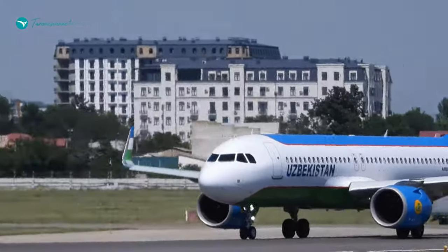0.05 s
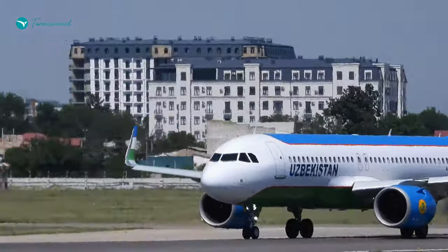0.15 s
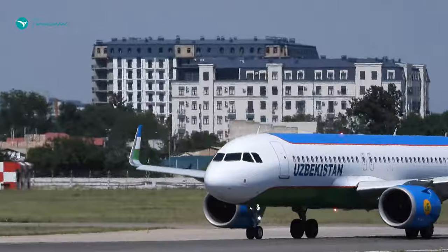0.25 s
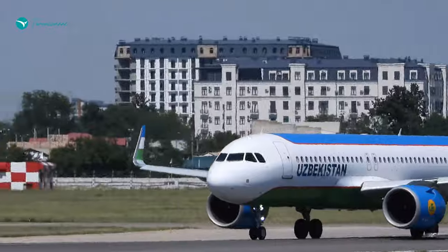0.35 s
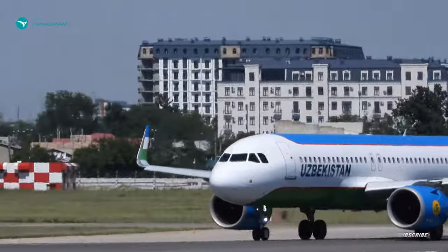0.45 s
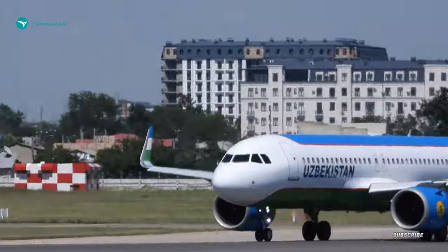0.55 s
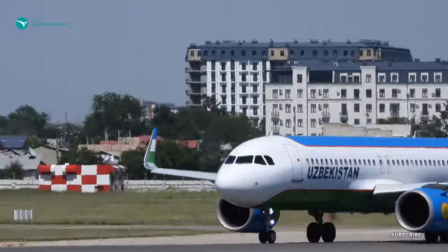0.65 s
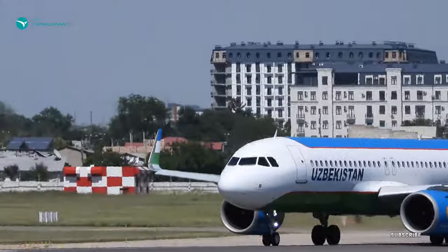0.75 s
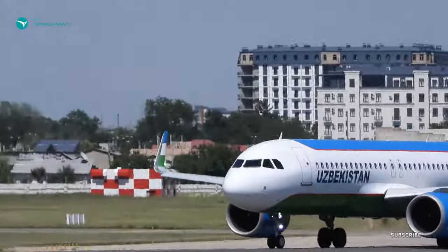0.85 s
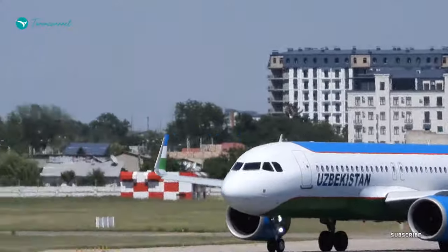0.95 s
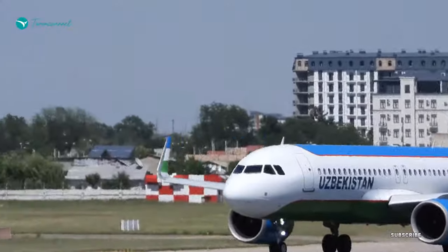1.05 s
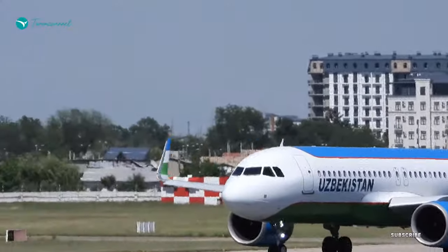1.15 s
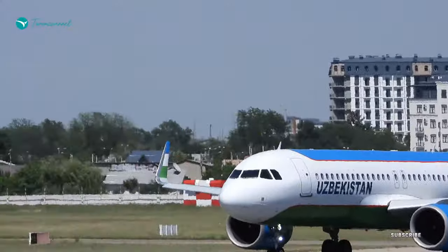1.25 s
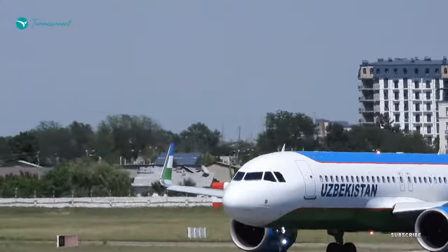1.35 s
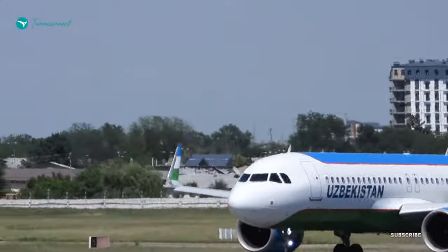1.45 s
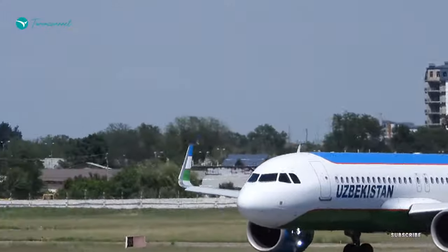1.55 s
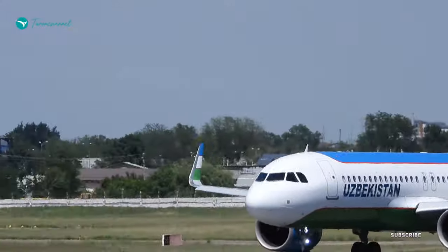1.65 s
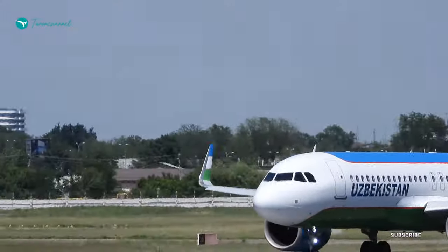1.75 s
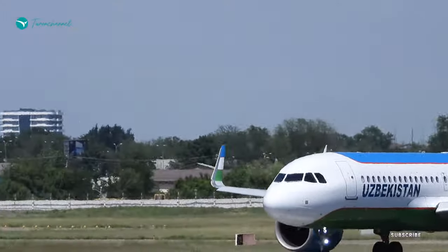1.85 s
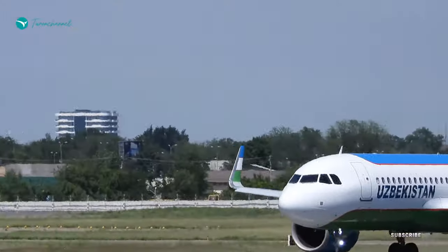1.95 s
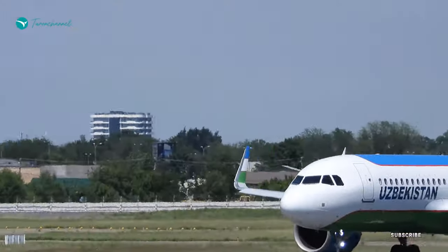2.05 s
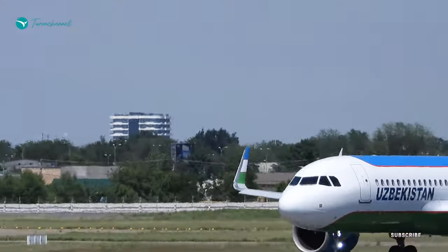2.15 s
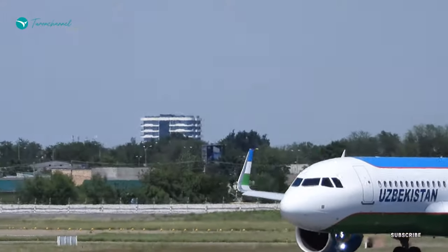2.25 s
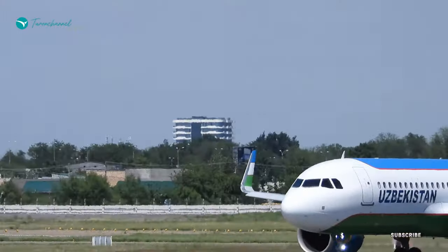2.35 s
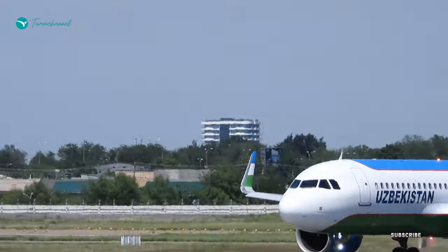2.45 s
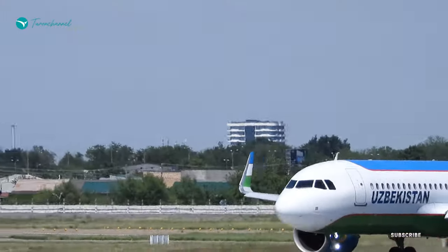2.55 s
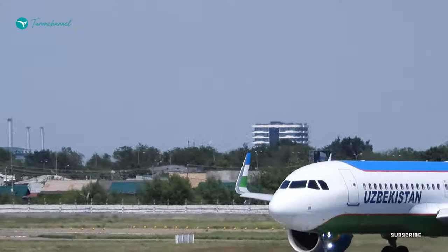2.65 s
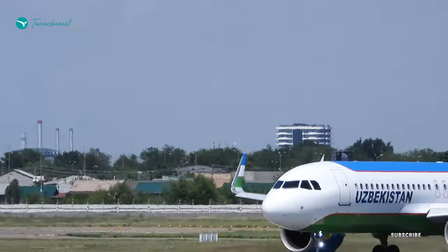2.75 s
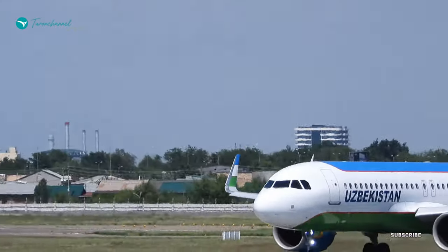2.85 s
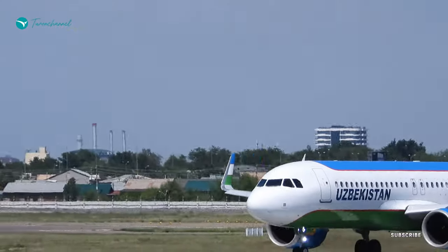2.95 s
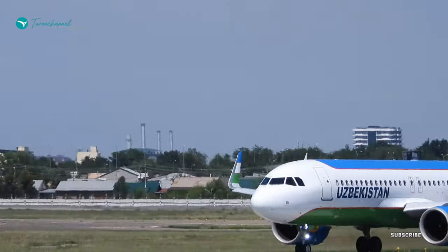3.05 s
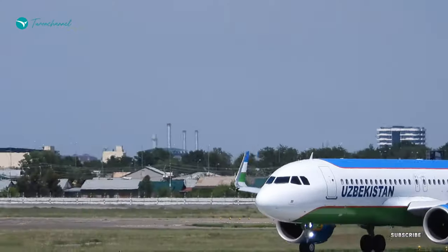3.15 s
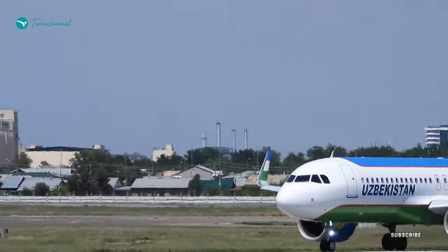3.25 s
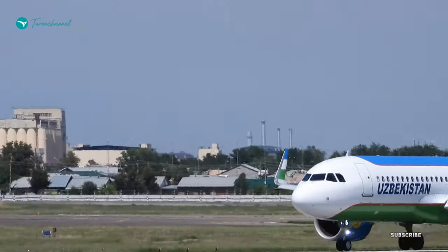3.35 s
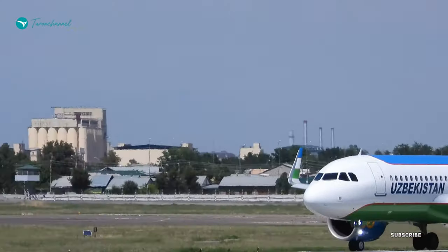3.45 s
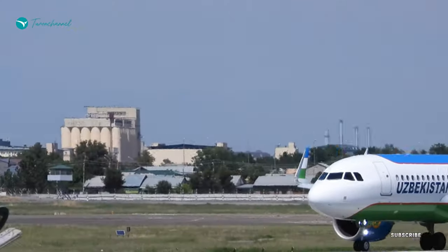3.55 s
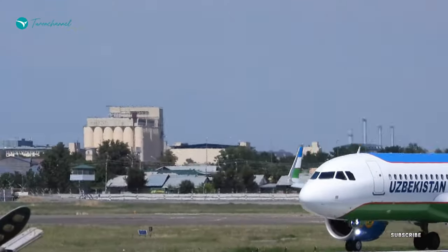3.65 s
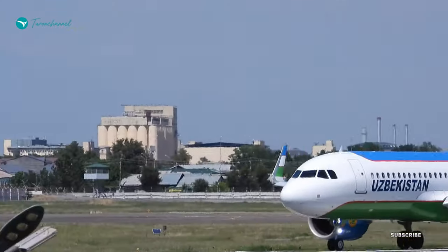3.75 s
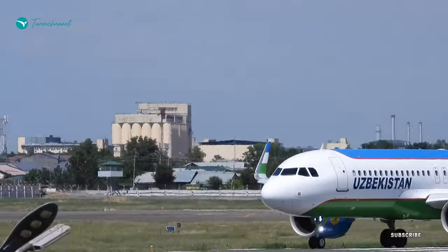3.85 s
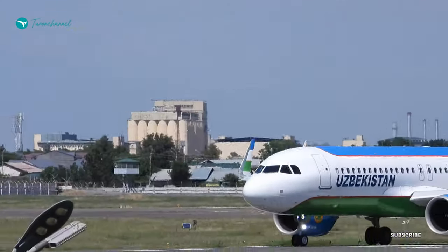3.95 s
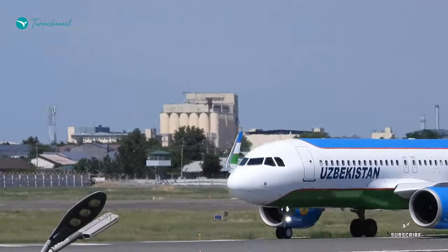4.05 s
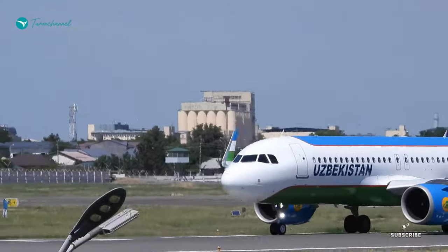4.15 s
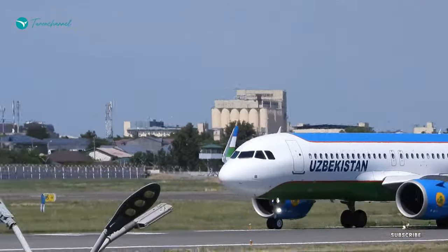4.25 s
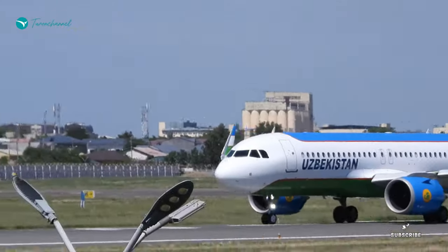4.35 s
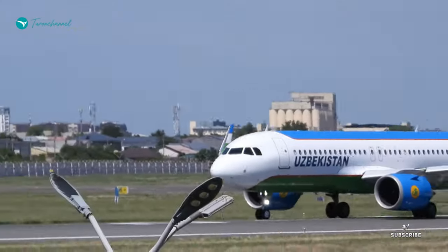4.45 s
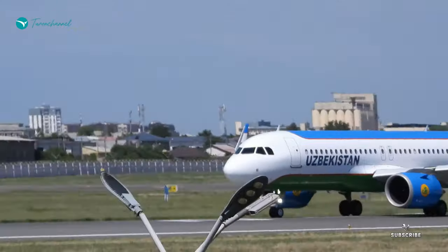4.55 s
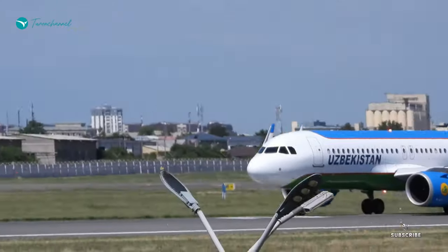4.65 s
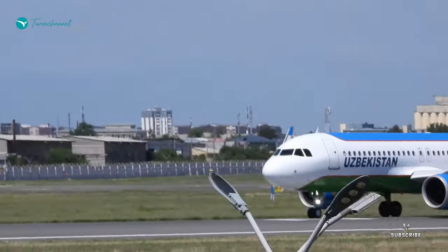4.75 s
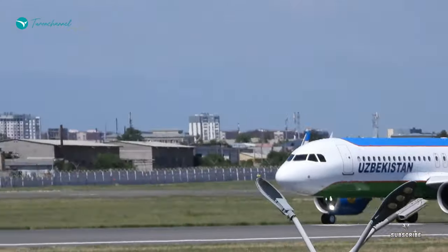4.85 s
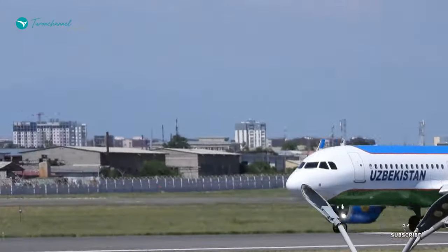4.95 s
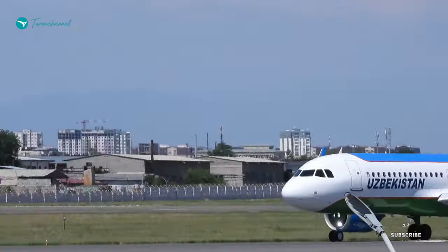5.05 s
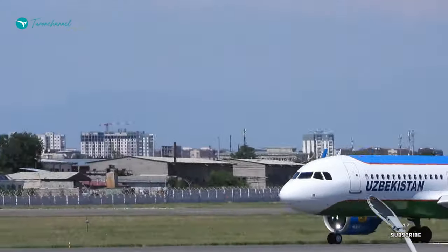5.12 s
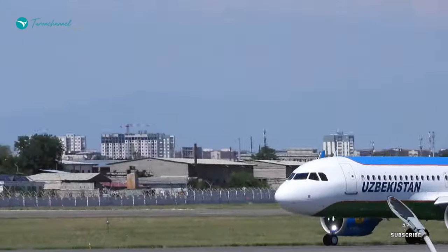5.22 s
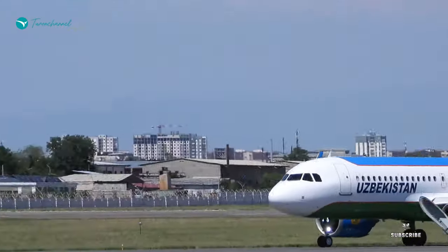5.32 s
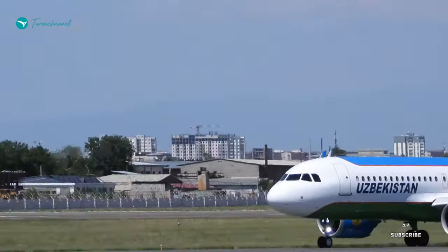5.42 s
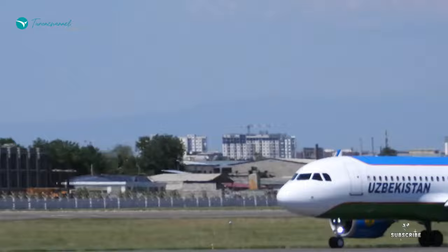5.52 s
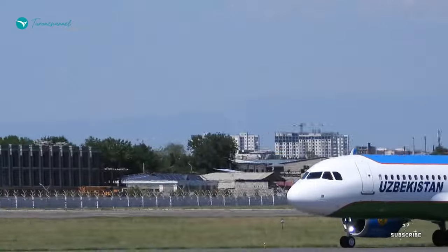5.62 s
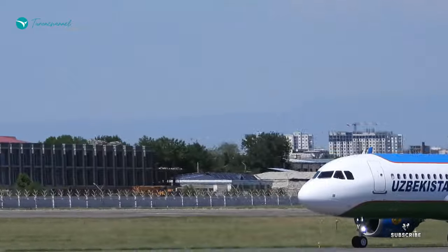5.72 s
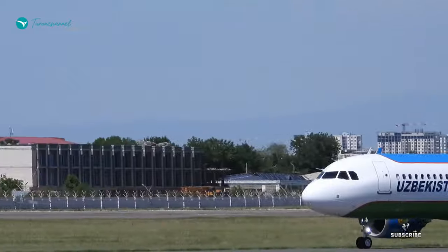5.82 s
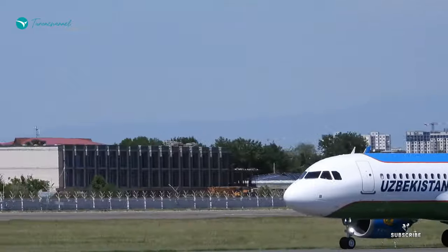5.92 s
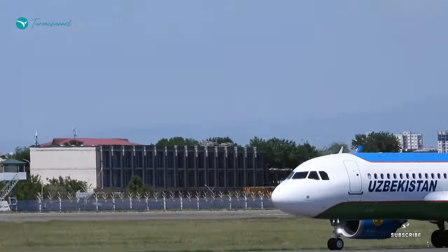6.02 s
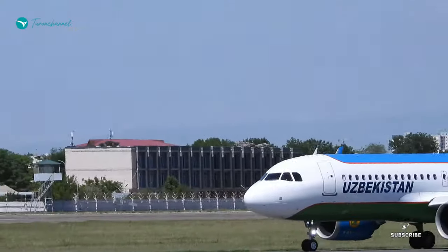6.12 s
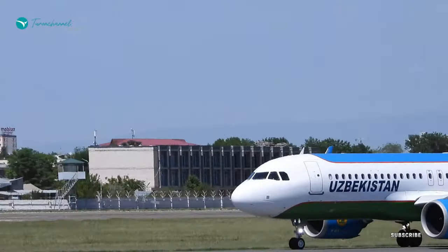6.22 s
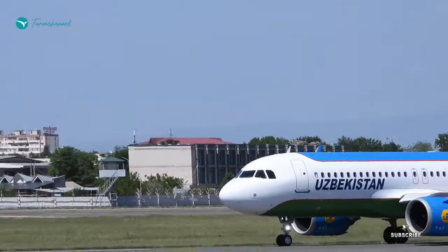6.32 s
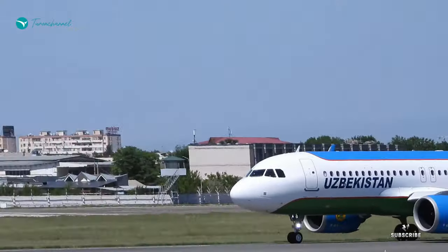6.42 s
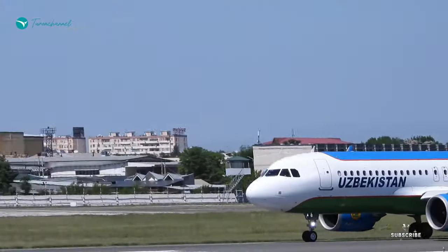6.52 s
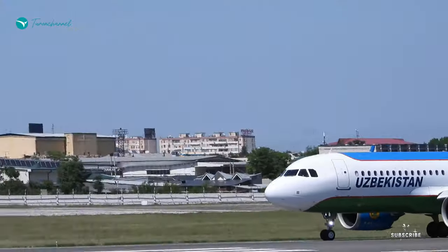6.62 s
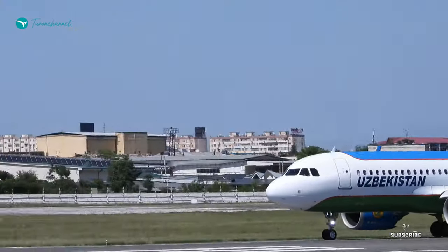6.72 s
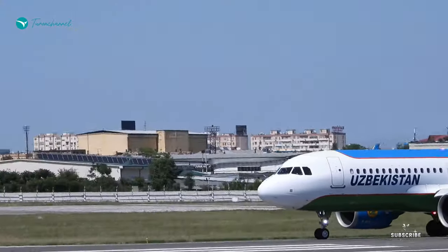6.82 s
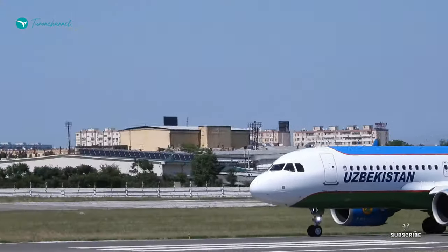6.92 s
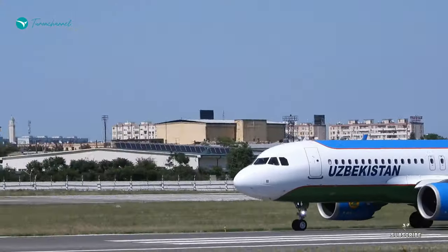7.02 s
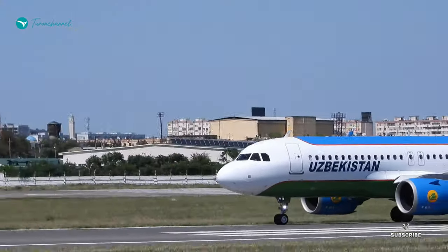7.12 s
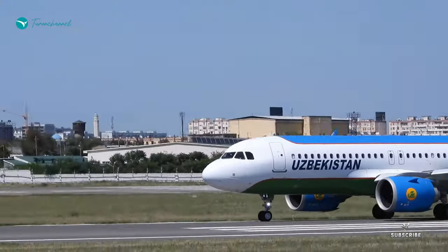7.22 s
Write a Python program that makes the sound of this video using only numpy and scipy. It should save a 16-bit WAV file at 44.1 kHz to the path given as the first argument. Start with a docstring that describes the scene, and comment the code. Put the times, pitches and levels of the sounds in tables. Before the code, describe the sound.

Outdoors beside a runway, gusts thump on a hand-held microphone and fingers rub and tick against its casing, with one soft knock midway. Behind this, the fan whine of a far-off airliner wavers and creeps up slightly in pitch over a weak rush. Then the hand noise ends and the jet draws near: a broad roar, a throbbing rumble and high whining tones build, loudest just before the end.

```python
"""A twin turbofan airliner rolls along a runway towards a hand-held camera.
Far off at first: the fan's blade tone and overtones fade in and out through warm, turbulent air
over a faint, broad roar. Wind buffets both microphone ports throughout. Until 5 s a hand rubs
and clicks the body near the left port. Then roar and combustor rumble swell, the second engine
comes out from behind the fuselage, and the sound peaks near 7 s."""
import sys
import numpy as np
from scipy import signal
from scipy.fft import rfft, irfft, next_fast_len
from scipy.io import wavfile
from scipy.ndimage import uniform_filter1d

SR = 44100
rng = np.random.default_rng(int(sys.argv[2]) if len(sys.argv) > 2 else 0)


def pcm_store(signal):
    """Save signal as 16-bit PCM."""
    levels = np.round(np.clip(np.atleast_2d(signal), -1, 1) * 32767)
    wavfile.write(sys.argv[1], SR, levels.astype(np.int16).T)


N = 321048

# hand rubbing (time [s], level [dB])
RUB_LEVEL = [(0, -78), (.32, -72), (.4, -48), (.5, -56), (.62, -47.5), (.74, -57.5), (.96, -70),
             (1.06, -58.5), (1.2, -47.5), (1.56, -55), (2.0, -49.5), (2.22, -55), (2.45, -51), (3.0, -50.5),
             (3.5, -51.5), (3.95, -52), (4.1, -47.5), (4.2, -54), (4.32, -53), (4.85, -51), (5.1, -85),
             (7.28, -79)]
# rubbing spectrum (frequency [Hz], density [dB])
RUB_COLOUR = [(400, -0.5), (700, 1), (1100, 9), (1700, -4.5), (2300, -14.5), (4000, -20.5), (6000, -28),
              (7500, -57)]
# body creaks (time [s], level [dB], left minus right [dB])
TICKS = [(0.4697, -56, 9.0), (0.4784, -63, 7.0), (0.498, -48, 16), (0.557, -52, 16), (0.5635, -51, 16),
         (0.58, -48, 21), (0.5934, -52, 21), (0.6024, -51, 13), (0.62, -48, 13), (0.6458, -67, 4.5),
         (1.224, -58, 0.0), (1.72, -47, 19), (1.7778, -47, 22), (1.9134, -60, 5), (2.0153, -48, 11),
         (2.4817, -59, 3.0), (3.0793, -56, 12), (3.0844, -49, 5), (3.104, -43.5, 13), (3.2803, -70, -3),
         (3.378, -45, 7), (3.426, -50, 7), (3.4819, -72, 14), (3.545, -54, 4), (3.597, -46, 18),
         (3.702, -54, 8), (4.207, -45, 10), (4.4466, -40.5, 12.5), (4.767, -44, 12)]
# snaps (time [s], level [dB])
SNAPS = [(0.398, -60), (0.4154, -45.5), (0.418, -48), (1.2717, -65), (1.734, -64), (2.994, -45.5),
         (3.5073, -78), (4.4478, -73), (6.945, -60)]
# bounces of one knock (time [s], level [dB], left minus right [dB])
KNOCKS = [(3.473, -31.5, 10), (3.478, -24, -5), (3.4823, -32.5, 17)]
# shell modes (frequency [Hz], gain [dB], t60 [s])
SHELL_MODES = [(172, -4, 0.066), (290, 17, 0.039), (471, 14.5, 0.053), (1050, 16, 0.021),
               (1420, -22, 0.017)]
# finger slips (time [s], level [dB], pitch [Hz], length [s], tapered share [0-1])
SLIPS = [(0.458, -47, 1080, 0.035, 0.8), (3.106, -38, 513, 0.02, 0.02), (3.69, -48.5, 474, 0.027, 0.5),
         (4.256, -45, 1153, 0.0086, 0.5), (4.688, -46.5, 282, 0.024, 0.01)]

# wind at the ports (time [s], level [dB])
WIND_LEVEL = [(0, -56), (.12, -53.5), (.56, -54.5), (.66, -46), (.77, -42.5), (.87, -46), (.92, -57),
              (1.03, -55.5), (1.1, -48), (1.25, -52.5), (1.34, -52), (1.49, -47.5), (1.6, -48), (2.0, -49),
              (2.25, -51), (2.52, -46.5), (2.66, -51), (2.88, -47.5), (3.04, -52.5), (3.7, -52.5),
              (4.0, -51.5), (4.2, -52.5), (5.2, -53), (5.6, -39.5), (6.1, -46.5), (6.76, -41),
              (7.28, -47.5)]
# wind spectrum (frequency [Hz], density [dB])
WIND_COLOUR = [(25, -21.5), (60, -15.5), (95, -27.5), (135, -15), (240, -4), (380, -6), (600, -10),
               (1000, -27)]
# strong eddies (time [s], level [dB], pitch [Hz], left minus right [dB], length [s])
BUFFETS = [(0.636, -45, 191, 3, 0.026), (0.713, -37, 290, -4, 0.018), (0.726, -34, 225, 2, 0.023),
           (0.787, -37, 334, -3, 0.022), (0.805, -35, 259, -1, 0.03), (0.878, -48, 450, -4, 0.019),
           (0.757, -46, 227, -1, 0.029), (0.848, -48, 220, 0, 0.023), (1.071, -41, 265, -1, 0.027),
           (1.106, -43.5, 320, -1, 0.034), (1.391, -43.5, 325, 3, 0.017), (1.46, -38, 242, 0, 0.04),
           (1.895, -43, 250, 3, 0.026), (1.962, -43, 380, 9, 0.028), (2.347, -40, 400, 1, 0.021),
           (2.405, -41.5, 323, -6, 0.019), (2.485, -44, 260, 0, 0.024), (2.519, -37, 277, 0, 0.035),
           (2.561, -39, 300, -2, 0.033), (2.664, -42, 315, -3, 0.024), (2.742, -44, 258, -1, 0.025),
           (2.905, -44, 173, 0, 0.031), (2.872, -39.5, 299.5, 2, 0.03), (2.95, -53, 140, 18, 0.031),
           (3.817, -49, 228, 20, 0.026), (3.846, -37, 277, 0.5, 0.021), (3.562, -46, 283, 1, 0.025),
           (3.966, -41.5, 234, -1, 0.031), (3.998, -42, 296, -3, 0.02), (4.149, -46, 380, 0, 0.017),
           (4.636, -47, 280, 2, 0.035), (4.051, -47, 284, -7, 0.025), (4.88, -40.5, 310, -1, 0.022),
           (5.209, -40.5, 372, -3, 0.02), (5.36, -33.5, 237, 0, 0.024), (5.419, -37, 277, 3, 0.021),
           (5.483, -36, 348, 1.5, 0.024), (5.635, -32.5, 202, 0.5, 0.03), (5.694, -36, 170, 1, 0.025),
           (5.728, -29.5, 310, -2, 0.019), (5.804, -36.5, 221, 1, 0.031), (5.878, -35, 290, 0, 0.019)]

# combustor rumble (time [s], level [dB])
RUMBLE_LEVEL = [(0, -60.5), (0.6, -67), (1.3, -71), (2.3, -54.5), (3.1, -68), (4.3, -59.5), (4.8, -64.5),
                (5.2, -51.5), (5.29, -52), (5.36, -47.5), (5.41, -53), (5.5, -44.5), (5.64, -46),
                (5.68, -53), (5.74, -45), (5.81, -47), (5.89, -42), (5.97, -52.5), (6.01, -46),
                (6.12, -48.5), (6.18, -34), (6.2, -49), (6.24, -47.5), (6.33, -39.5), (6.39, -42.5),
                (6.44, -34.5), (6.52, -36), (6.58, -31.5), (6.64, -31), (6.69, -27), (6.71, -22.5),
                (6.76, -32), (6.81, -25.5), (6.88, -29.5), (6.94, -24.5), (7.02, -26.5), (7.07, -26),
                (7.09, -26.5), (7.14, -39.5), (7.18, -27.5), (7.27, -31)]
# combustor resonances (frequency [Hz], width [Hz], gain [dB])
COMBUSTOR_MODES = [(297.5, 59.6, 3), (379, 86, -3.5), (238, 120, -13.5), (459.7, 100, -8), (547.3, 67, -15),
                   (596.4, 16, -5)]
# roar envelope (time [s], gain [dB])
ROAR_GAIN = [(0, -72), (.42, -69.5), (.6, -84.5), (.98, -71.5), (1.26, -75.5), (1.65, -68), (2.1, -69.5),
             (2.3, -63), (2.8, -67), (3.1, -73), (3.7, -65.5), (4.32, -67.5), (4.7, -68.5), (5.04, -62.5),
             (5.22, -60.5), (5.4, -55), (5.75, -52.5), (6.16, -51), (6.44, -45), (6.58, -42.5), (6.82, -37),
             (7.0, -36.5), (7.13, -36.5), (7.28, -41)]
# roar spectrum (frequency [Hz], density [dB])
ROAR_COLOUR = [(420, -28.5), (560, -5.5), (900, 4.5), (1250, -3.5), (1600, -2), (1850, -2.5), (2200, -7),
               (2500, -2.5), (3550, -6), (3780, -14.5), (4050, -16), (4800, -14), (5500, -20.5),
               (6500, -31.5), (13500, -66)]
# roar below 3.2 kHz; far = dull (time [s], gain [dB])
MIDDLE_GAIN = [(0, 10.5), (1.4, 6.5), (2.0, 5.5), (3.2, 4.5), (3.8, 1.5), (6.2, 4.5), (6.7, -1),
               (7.28, 4.5)]
# roar above 4.6 kHz (time [s], gain [dB])
TREBLE_GAIN = [(0, 4.5), (2.5, -1.5), (5, 0.5), (6, 1), (6.3, 4), (6.8, 1), (7.28, 1)]
# roar above 7 kHz, added to the treble gain (time [s], gain [dB])
TOP_GAIN = [(0, -5.5), (5, -8), (6.05, -5.5), (6.22, 8.5), (6.67, 4.5), (6.76, -8), (7.03, -6), (7.28, 6)]
# left-right likeness of the roar (frequency [Hz], coherence [0-1])
COHERENCE = [(300, 1), (1000, 0.97), (3500, 0.94), (6500, 0.75), (9000, .2)]

# near fan, spooling up and settling (time [s], blade-passing rate [Hz])
BLADE_RATE = [(0, 933.5), (.46, 945), (.92, 954.5), (1.38, 963), (1.95, 971), (2.4, 975), (2.8, 978),
              (3.5, 981), (4.5, 986), (5.56, 992), (6.4, 991.5), (7.28, 986)]
# harmonics 1-3; each drops out when its air paths cancel (time [s], level [dB])
BLADE_LEVEL = [(0.0, -43.5), (0.11, -43), (0.15, -52.5), (0.25, -38.5), (0.35, -61), (0.37, -50.5),
               (0.41, -49.5), (0.44, -67), (0.56, -64), (0.74, -52.5), (0.77, -68), (0.83, -67),
               (0.85, -53), (0.89, -53.5), (0.96, -55), (0.99, -68), (1.1, -44.5), (1.19, -66),
               (1.23, -48.5), (1.28, -41.5), (1.37, -46.5), (1.4, -77), (1.43, -63), (1.46, -52),
               (1.48, -50.5), (1.55, -44), (1.71, -48.5), (1.75, -59), (1.81, -48), (1.9, -55.5),
               (1.96, -43), (2.06, -50.5), (2.1, -38.5), (2.24, -36), (2.32, -52), (2.36, -45.5),
               (2.45, -60), (2.49, -47.5), (2.53, -59), (2.56, -45.5), (2.6, -65), (2.62, -43.5),
               (2.68, -37.5), (2.77, -56), (2.81, -44), (2.89, -45.5), (2.92, -55), (3.03, -45), (3.1, -63),
               (3.14, -69), (3.16, -51), (3.29, -49), (3.33, -39.5), (3.41, -48.5), (3.46, -42),
               (3.51, -52), (3.61, -45.5), (3.66, -67), (3.71, -44.5), (3.73, -56), (3.76, -38),
               (3.79, -35), (3.9, -53), (3.94, -47), (3.97, -72), (4.05, -49), (4.08, -70), (4.1, -49),
               (4.13, -65.0), (4.15, -65), (4.19, -52), (4.23, -65.0), (4.25, -66), (4.29, -81),
               (4.31, -85), (4.34, -42), (4.37, -42), (4.46, -44), (4.53, -54.5), (4.56, -49), (4.63, -47),
               (4.66, -48), (4.69, -76), (4.71, -60), (4.79, -40), (4.85, -64), (4.89, -42.5),
               (4.95, -49.5), (5.01, -41), (5.05, -46), (5.07, -54), (5.28, -33), (5.46, -35), (5.54, -27),
               (5.63, -35.5), (5.66, -48.5), (5.69, -36), (5.74, -30), (5.8, -35), (5.92, -32), (5.98, -41),
               (6.0, -57.5), (6.09, -30), (6.13, -49.5), (6.19, -28.5), (6.3, -26.5), (6.36, -34),
               (6.42, -24.5), (6.49, -26), (6.57, -30.5), (6.6, -40), (6.64, -22), (6.81, -25), (6.87, -14),
               (6.94, -16), (6.98, -25.5), (7.05, -18), (7.1, -32), (7.17, -22.5), (7.27, -31)]
SECOND_LEVEL = [(0.0, -75), (0.12, -63), (0.2, -70), (0.46, -61.5), (0.54, -72), (0.63, -62.5), (0.79, -70),
                (1.24, -62), (1.29, -79), (1.34, -63), (1.43, -64), (1.47, -70), (1.65, -53), (1.72, -67),
                (1.94, -73), (2.0, -55), (2.13, -71), (2.22, -53), (2.28, -60.5), (2.36, -46), (2.57, -70),
                (2.62, -65.5), (2.91, -63.5), (3.01, -80), (3.13, -69), (3.27, -81), (3.31, -68),
                (3.43, -64), (3.48, -83), (3.58, -66), (3.76, -76), (3.83, -60.5), (3.95, -68.5),
                (4.12, -69), (4.16, -63), (4.21, -76), (4.33, -56), (4.56, -65.5), (4.6, -74), (4.66, -82),
                (4.76, -61), (4.84, -71.0), (4.9, -57.5), (5.03, -65), (5.08, -71), (5.16, -56),
                (5.25, -67), (5.31, -50.5), (5.38, -56), (5.45, -47), (5.66, -50.5), (5.75, -60),
                (5.87, -47.5), (6.01, -58), (6.19, -52), (6.23, -64), (6.28, -49), (6.44, -37.5),
                (6.52, -45.5), (6.68, -34), (6.74, -43), (6.82, -28), (6.96, -37.5), (7.27, -42.5)]
THIRD_LEVEL = [(0.0, -65.5), (0.17, -67), (0.24, -80), (0.38, -69), (0.45, -80), (0.7, -81), (0.87, -74),
               (1.05, -72.5), (1.22, -76.5), (1.32, -70), (1.41, -75), (1.62, -73), (1.96, -66.5),
               (2.06, -76), (2.23, -57), (2.43, -71.0), (2.67, -64.5), (2.95, -68), (3.04, -74),
               (3.16, -68), (3.24, -88), (3.44, -68.5), (3.71, -75), (3.81, -68), (4.3, -71.5), (4.41, -67),
               (4.5, -72.5), (4.81, -69), (4.92, -76.5), (5.07, -63), (5.19, -74), (5.55, -57.5),
               (6.08, -64), (6.85, -35), (7.16, -43.5), (7.27, -61)]
# base of all high tones (time [s], level [dB])
WHINE_LEVEL = [(0.0, -81), (0.22, -76), (0.53, -86), (0.65, -79), (0.77, -90), (0.9, -78.5), (1.08, -88),
               (1.31, -77), (1.45, -83.5), (1.66, -78), (1.8, -81.0), (1.95, -76), (2.22, -77), (2.3, -72),
               (2.37, -74.5), (2.45, -78), (2.75, -79.5), (3.01, -81), (3.95, -79), (4.58, -77),
               (4.71, -82), (5.13, -72.5), (5.28, -76), (5.66, -64), (5.92, -71), (7.03, -52), (7.27, -59)]
# high tones; fractional ones from rotor-stator interplay (order [x blade rate])
WHINE_ORDERS = [3.72, 4, 4.722, 5, 5.732, 6]
# one per order (level over whine [dB])
WHINE_GAINS = [-11, -8, -10, 1, -14, -20.5]
# fractional orders grow as the intakes near (time [s], gain [dB])
FRACTIONAL_GAIN = [(0, -1), (5.5, 4.5), (6.5, 4.5), (7.28, 6.5)]
# far fan (time [s], blade-passing rate [Hz], level over whine [dB])
FAR_FAN = [(0, 930, -25), (5, 983, -16), (6, 986, -5), (6.6, 986, 0), (7.28, 985, 0)]
# its harmonics (order [x blade rate], gain [dB])
FAR_ORDERS = [(4, 0), (5, 0), (6, -10)]

STROKE_DB, STROKE_RATE_HZ = .7, 10
GUST_DB, GUST_RATE_HZ = 1.5, 10
THROB_DB, THROB_RATE_HZ = 1.5, 20
FLUTTER_DB, FLUTTER_RATE_HZ = .9, 40
OVERTONE_FADE, WHINE_FADE, FADE_HZ_PER_ORDER = .3, .12, 25
LOW_CUT_HZ, HIGH_CUT_HZ, HISS_DB = 90, 15800, -104
LEFT_RIGHT = np.array([[1], [-1]])


def undb(db):
    return 10 ** (np.asarray(db) / 20)


def unit_rms(x):
    return x / np.sqrt(np.mean(x ** 2))


def curve(table, column=1):
    """One column, linear in time, per sample."""
    points = np.transpose(table)
    return np.interp(np.arange(N) / SR, points[0], points[column])


def at_hz(table, hz):
    """Table value, linear in log frequency."""
    points_hz, values = np.transpose(table)
    return np.interp(np.log(hz), np.log(points_hz), values)


def shelf(hz, corner_hz):
    """0 to 1 over the half octave above the corner."""
    return np.clip(2 * np.log2(hz / corner_hz), 0, 1)


def walk(rate_hz):
    """Random steps at rate_hz, smoothed twice; RMS 1."""
    step = 32
    hold = int(SR / rate_hz / step)
    coarse = np.repeat(rng.standard_normal(N // step // hold + 2), hold)
    coarse = unit_rms(uniform_filter1d(uniform_filter1d(coarse, hold), hold))
    return np.interp(np.arange(N) / step, np.arange(len(coarse)), coarse)


def complex_walk(rate_hz):
    return walk(rate_hz) + 1j * walk(rate_hz)


def stereo(mid, side, coherence):
    """Left and right of given coherence."""
    return np.sqrt((1 + coherence) / 2) * mid + np.sqrt((1 - coherence) / 2) * side * LEFT_RIGHT


def add(out, start_s, shape, pan_db):
    """Mix in a short sound; pan_db is left minus right."""
    i = int(start_s * SR)
    out[:, i:i + shape.shape[-1]] += shape[..., :N - i] * undb(LEFT_RIGHT * pan_db / 2)


def bands(x, colour, per_octave):
    """Colour x, then yield overlapping bands as (centre [Hz], signal)."""
    size = next_fast_len(N)
    hz = np.maximum(np.arange(size // 2 + 1) * SR / size, 1)
    spectrum = rfft(x, size) * undb(at_hz(colour, hz))
    place = per_octave * np.log2(hz)
    first, last = (int(per_octave * np.log2(colour[i][0])) for i in (0, -1))
    for k in range(first, last + 1):
        share = np.cos(np.pi / 2 * np.clip(place - k, -1, 1)) ** 2
        yield 2 ** (k / per_octave), irfft(spectrum * share, size)[..., :N]


def resonance(x, hz, width_hz):
    """Band-pass, applied twice."""
    b, a = signal.iirpeak(hz, hz / width_hz, SR)
    return signal.lfilter(b, a, signal.lfilter(b, a, x))


def lumpy_noise(colour, lump_db, rate_hz):
    """Independent noise per port: octave bands flicker, the sum comes in lumps."""
    octaves = bands(rng.standard_normal((2, N)), colour, per_octave=1)
    ports = sum(undb(1.1 * walk(18)) * band for _, band in octaves)
    return np.array([unit_rms(port * undb(lump_db * walk(rate_hz))) for port in ports])


def rubbing():
    """Grainy friction under wandering hand pressure, mostly left."""
    level_db = curve(RUB_LEVEL) + STROKE_DB * walk(STROKE_RATE_HZ) + 3 * LEFT_RIGHT
    return undb(level_db) * lumpy_noise(RUB_COLOUR, lump_db=2.8, rate_hz=120)


def ticks():
    """The camera body creaks in dull ticks."""
    out = np.zeros((2, N))
    t = np.arange(1024) / SR
    dull = signal.butter(6, [800, 6000], "band", fs=SR, output="sos")
    for start_s, db, pan_db in TICKS:
        grit = signal.lfilter([1], [1, -.88], rng.standard_normal(len(t)) ** 3)
        crack = grit * t * np.exp(-t / .0028)
        tick = signal.sosfilt(dull, crack + undb(7.5) * resonance(crack, 1400, 700))
        add(out, start_s, undb(db) * tick / abs(crack).max(), pan_db)
    return out


def snaps():
    """Sharp cracks with a brief, faint noise decay, at the left port."""
    out = np.zeros((2, N))
    t = np.arange(1024) / SR
    for start_s, db in SNAPS:
        snap = rng.standard_normal(len(t)) * (np.exp(-t / .00055) + undb(-23) * np.exp(-t / .004))
        body = undb(4.5) * resonance(snap, 1800, 2000)
        add(out, start_s, undb(db) * (snap + body) / abs(snap).max(), pan_db=20)
    return out


def knock():
    """A soft fingertip bounces on the shell and rings its modes."""
    out = np.zeros((2, N))
    t = np.arange(4096) / SR
    ring = sum(undb(db - 60 * t / t60_s) * np.sin(2 * np.pi * hz * t) for hz, db, t60_s in SHELL_MODES)
    ring *= 1 - np.exp(-(t / .00043) ** 2)
    for start_s, db, pan_db in KNOCKS:
        add(out, start_s, -undb(db) * ring / abs(ring).max(), pan_db)
    return out


def slips():
    """A finger slips; the shell hums at the left port."""
    out = np.zeros((2, N))
    for start_s, db, hz, length_s, taper in SLIPS:
        t = np.arange(int(length_s * SR)) / SR
        hum = signal.windows.tukey(len(t), taper) * np.sin(2 * np.pi * hz * t)
        add(out, start_s, undb(db) * hum, pan_db=16)
    return out


def wind():
    """Eddies thump each port separately."""
    level_db = curve(WIND_LEVEL) + GUST_DB * walk(GUST_RATE_HZ)
    return undb(level_db) * lumpy_noise(WIND_COLOUR, lump_db=3.6, rate_hz=45)


def buffets(roughness=.8):
    """The strongest eddies: bursts of a few rough, gliding cycles."""
    out = np.zeros((2, N))
    for start_s, db, hz, pan_db, length_s in BUFFETS:
        eddy = rng.standard_normal((2, 4096))
        count = int(length_s * SR)
        window = signal.windows.tukey(count, .8)
        burst = resonance(resonance(eddy, 1.3 * hz, 2 * hz), 1.3 * hz, 3 * hz)[:, -count:] * window
        burst /= abs(burst).max(axis=1, keepdims=True)
        glide_hz = hz * (1 + .5 * eddy[1, 2] * np.linspace(-.5, .5, count))
        start_rad = 2 * eddy[0, 0] + eddy[:, 1:2]
        cycles = np.sin(2 * np.pi * np.cumsum(glide_hz) / SR + start_rad) * window
        add(out, start_s, undb(db) * (cycles + roughness * burst), pan_db)
    return out


def rumble(noise):
    """Noise drives the combustor resonances; the level throbs."""
    modes = sum(undb(db) * resonance(resonance(noise, hz, width_hz), hz, 2 * width_hz)
                for hz, width_hz, db in COMBUSTOR_MODES)
    low = stereo(*modes, COHERENCE[0][1])
    running_rms = np.sqrt(uniform_filter1d(low[0] ** 2, SR // 12))
    return undb(curve(RUMBLE_LEVEL) + THROB_DB * walk(THROB_RATE_HZ)) * low / running_rms


def roar(noise):
    """Exhaust and fan rush; narrow bands fade separately on their way through the air."""
    middle_db, treble_db, top_db = curve(MIDDLE_GAIN), curve(TREBLE_GAIN), curve(TOP_GAIN)
    swell_db = .4 * walk(9)
    out = 0
    for hz, band in bands(noise, ROAR_COLOUR, per_octave=7):
        middle_share = np.clip(np.log2(3200 / hz), 0, 1)
        tilt_db = middle_share * middle_db + shelf(hz, 4600) * treble_db + shelf(hz, 7000) * top_db
        fade_db = (2.6 - shelf(hz, 3500)) * walk(18)
        out += undb(tilt_db + swell_db + fade_db) * stereo(*band, at_hz(COHERENCE, hz))
    return undb(curve(ROAR_GAIN) + 19.5) * out


def far_fan():
    """Whine of the slightly slower engine, hidden by the fuselage at first."""
    blade_rad = 2 * np.pi * np.cumsum(curve(FAR_FAN)) / SR
    level_db = curve(WHINE_LEVEL) + curve(FAR_FAN, column=2)
    return sum(undb(level_db + db + 2.5 * walk(20)) * np.sin(order * (blade_rad + .3 * walk(20)))
               for order, db in FAR_ORDERS)


def turbulent_tone(order, blade_rad):
    """One fan tone: turbulence shakes its phase, eddies scatter it, shifting paths fade overtones."""
    shake_rad = min(order, 3.5) * (.55 * walk(11) + .17 * walk(45))
    scatter_depth = .12 * order ** 1.7 if order < 2.5 else .55 if order < 3.5 else .22
    scatter = scatter_depth * complex_walk(70)
    fade = OVERTONE_FADE if order in (2, 3) else WHINE_FADE
    shifting = fade * complex_walk(order * FADE_HZ_PER_ORDER)
    paths = 1 if order == 1 else 1 - fade / 2 + shifting
    spread_rad = .062 * walk(24) * LEFT_RIGHT
    carrier = np.exp(1j * (order * blade_rad + shake_rad + spread_rad))
    return np.sqrt(2) * np.imag(paths * (1 + scatter) * carrier)


def near_fan():
    """Blade-passing tone, harmonics and high whine, each with its own flutter."""
    blade_rad = 2 * np.pi * np.cumsum(curve(BLADE_RATE)) / SR
    tones = [(1, curve(BLADE_LEVEL) + FLUTTER_DB * walk(FLUTTER_RATE_HZ)),
             (2, curve(SECOND_LEVEL) + .72 * walk(30)),
             (3, curve(THIRD_LEVEL) + 1.2 * walk(30))]
    for order, db in zip(WHINE_ORDERS, WHINE_GAINS):
        fractional_db = curve(FRACTIONAL_GAIN) if order % 1 else 0
        tones.append((order, curve(WHINE_LEVEL) + db + fractional_db + 2.3 * walk(45)))
    return sum(undb(level_db) * turbulent_tone(order, blade_rad) for order, level_db in tones)


def scene():
    fans = near_fan() + far_fan()
    jet_noise = rng.standard_normal((2, N))
    airliner = fans + roar(jet_noise) + rumble(jet_noise)
    air = wind() + buffets()
    hand = rubbing() + ticks() + snaps() + knock() + slips()
    return airliner + air + hand


def record(dry):
    """Microphone: low cut, faint hiss, steep high cut."""
    thin = signal.sosfilt(signal.butter(3, LOW_CUT_HZ, "high", fs=SR, output="sos"), dry)
    noisy = thin + undb(HISS_DB) * rng.standard_normal(dry.shape)
    return signal.sosfilt(signal.ellip(8, .2, 70, HIGH_CUT_HZ, fs=SR, output="sos"), noisy)


dry = scene()
out = record(dry)
pcm_store(out)
```